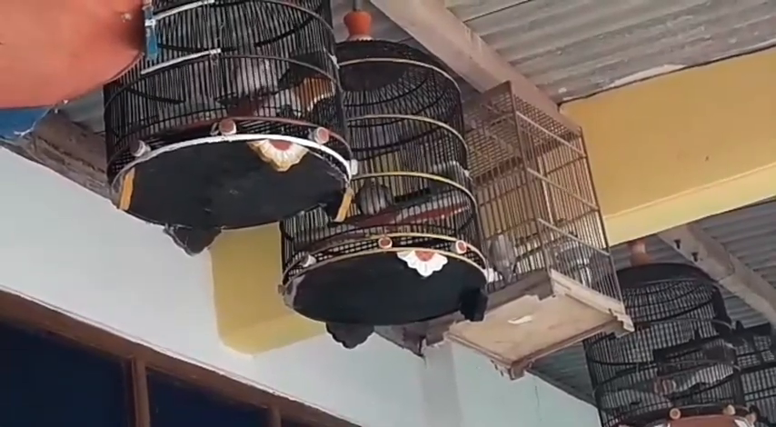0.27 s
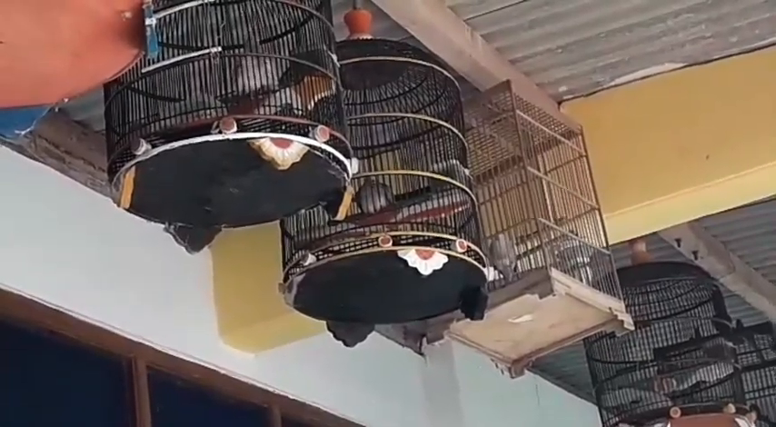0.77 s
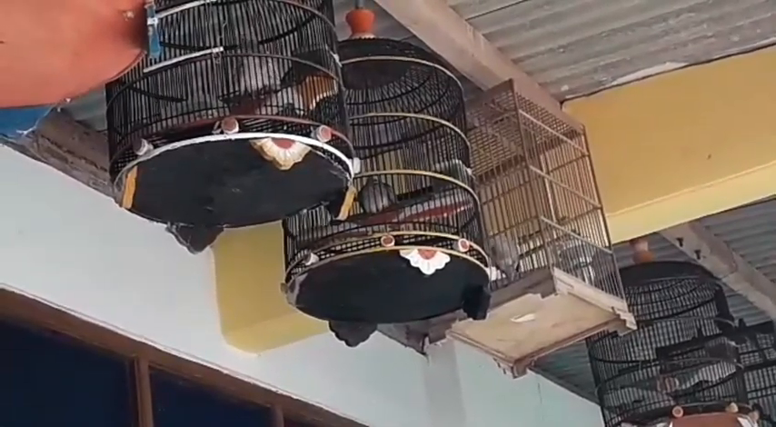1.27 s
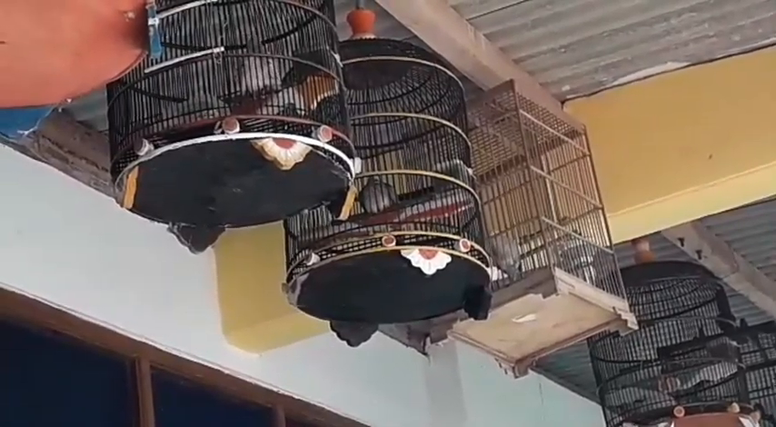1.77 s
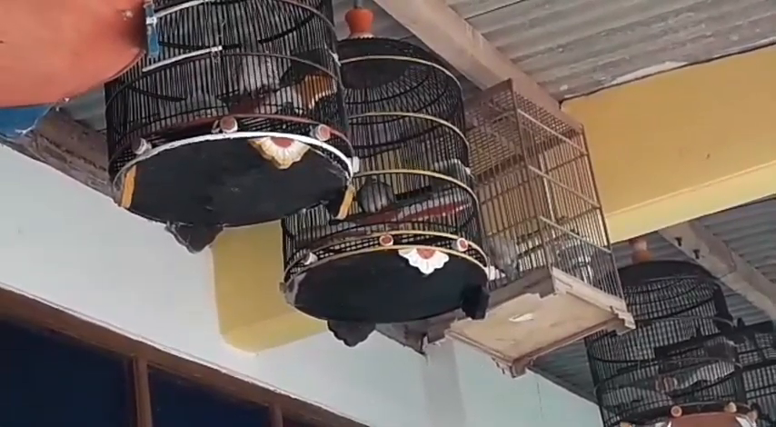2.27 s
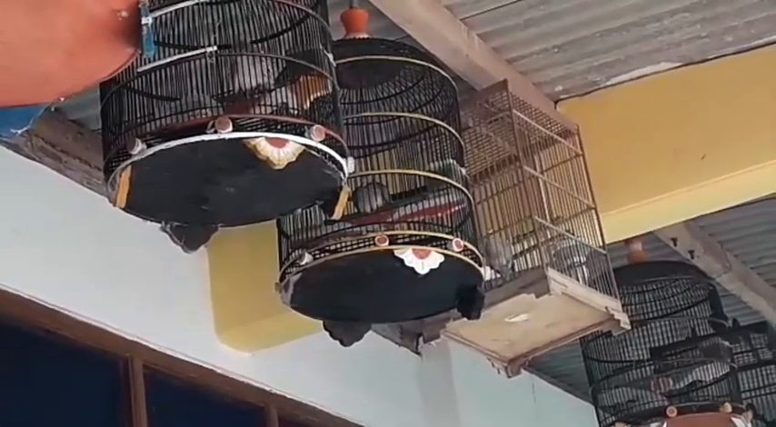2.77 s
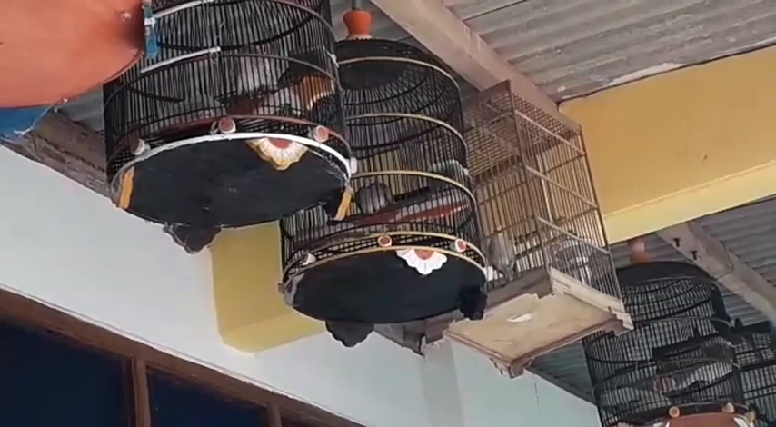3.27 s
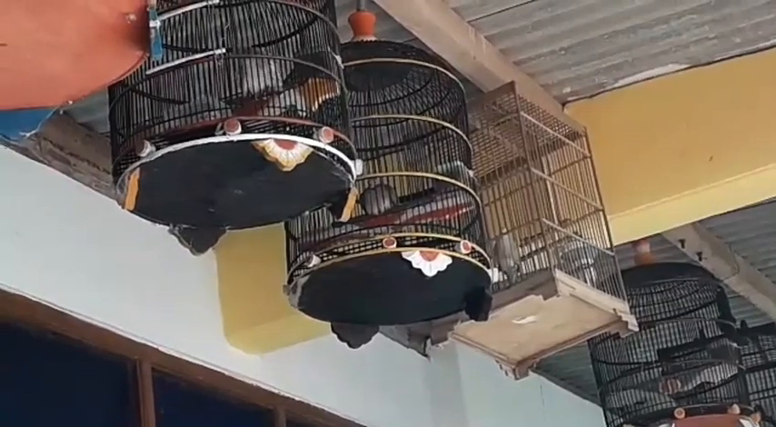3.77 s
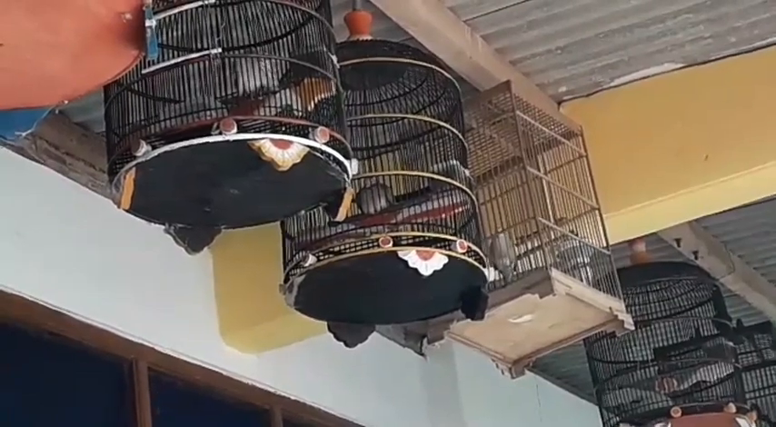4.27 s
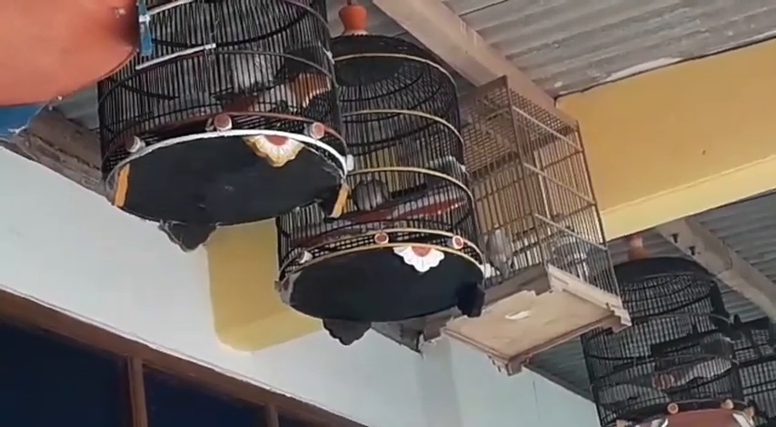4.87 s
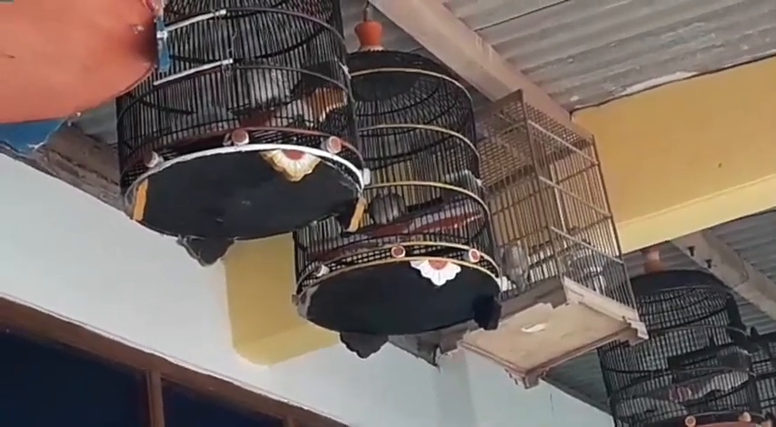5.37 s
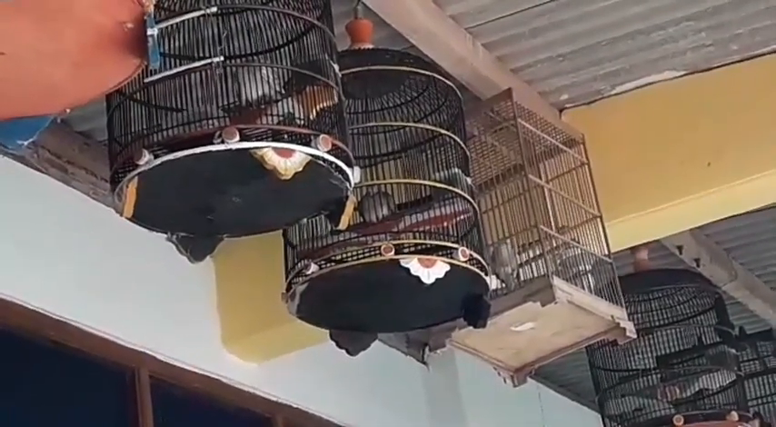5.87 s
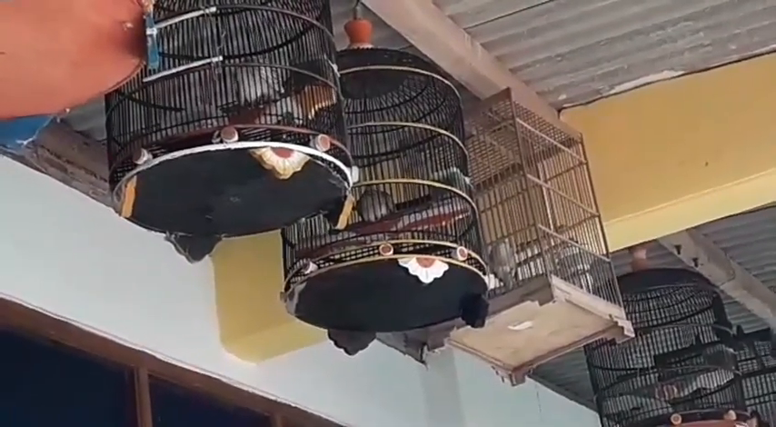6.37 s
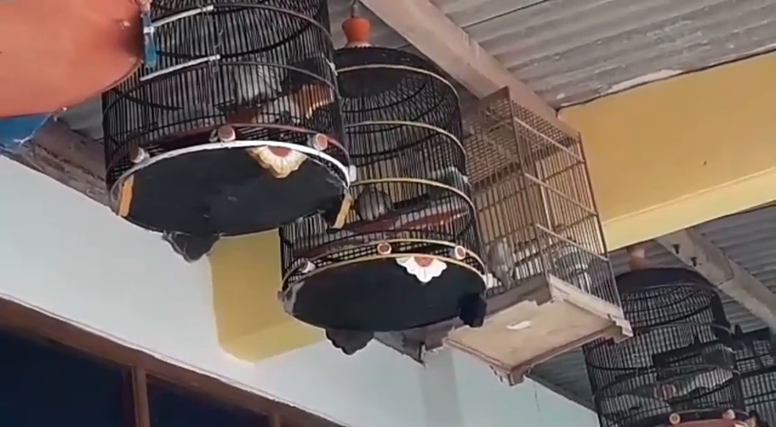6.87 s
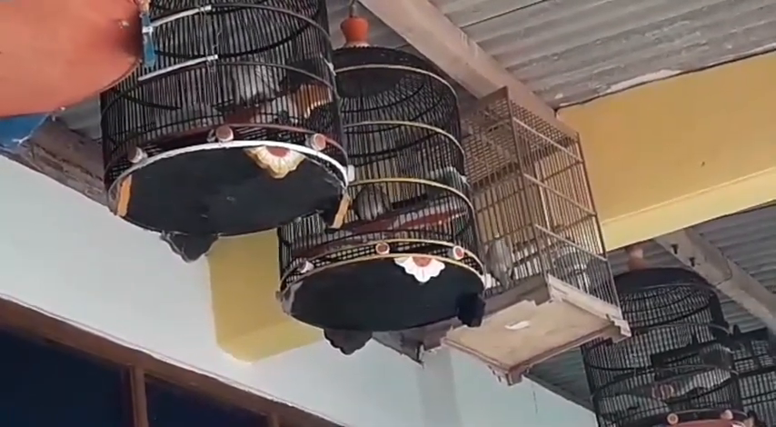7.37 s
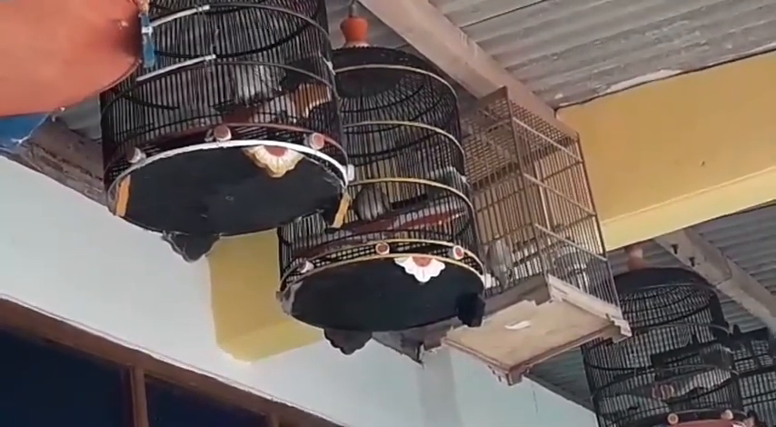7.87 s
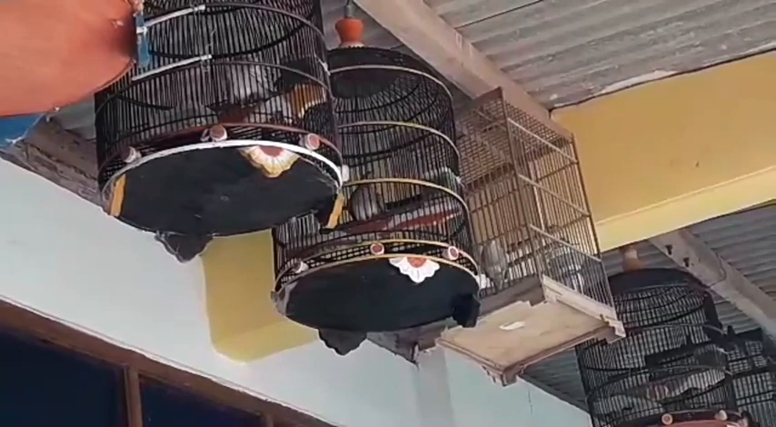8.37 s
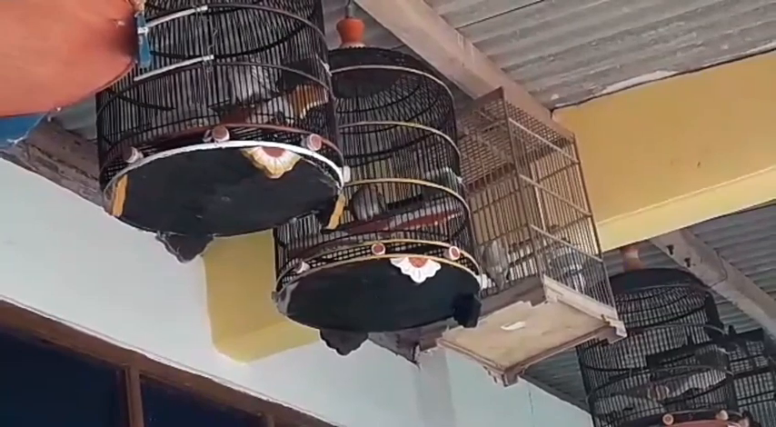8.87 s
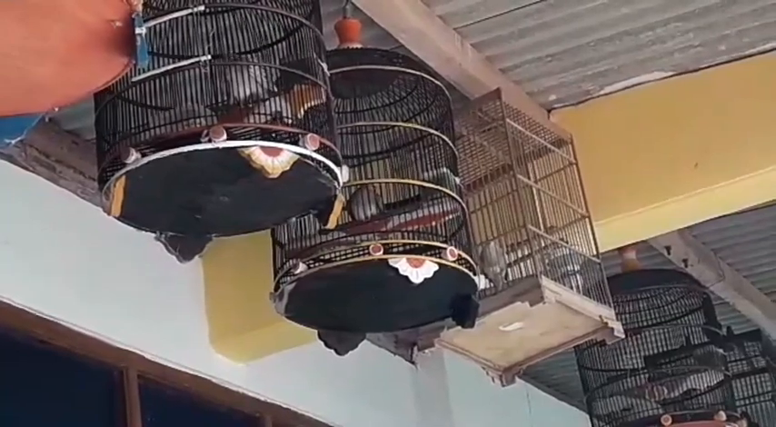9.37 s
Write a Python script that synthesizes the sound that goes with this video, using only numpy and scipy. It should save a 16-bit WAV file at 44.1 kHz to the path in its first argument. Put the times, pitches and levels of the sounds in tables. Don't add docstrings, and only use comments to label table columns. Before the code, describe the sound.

Outdoor porch, handheld phone below hanging cages. Distant doves hoot softly first, then a near dove gives a rapid rolling phrase ending in a longer sagging coo. A neighbour replies with five spaced coos, softening each time, before the near dove sings again and others follow. Bristles scrape the floor with sharper strokes later, cages tick lightly, thin bird whistles and engine throbs stay behind.

```python
import sys
import numpy as np
from scipy import signal
from scipy.io import wavfile
from scipy.ndimage import uniform_filter1d

SR = 44100
rng = np.random.default_rng(int(sys.argv[2]) if len(sys.argv) > 2 else 0)


def volts_from_db(level):
    exponent = np.asarray(level, float) / 20
    return 10 ** exponent


def waveform_to_disk(signal):
    frames = np.transpose(np.atleast_2d(signal))
    scaled = np.clip(frames, -1, 1) * 32767
    samples = np.round(scaled).astype(np.int16)
    wavfile.write(sys.argv[1], SR, samples)


N = 424683

# (time [s], stretch of the durations [ratio], lead-in [s])
OPENS = [
    (3.583, 1.015, .034),
    (7.693, .985, .026),
]


def band(x, lo_hz, hi_hz):
    y = signal.sosfilt(signal.butter(2, [lo_hz, hi_hz], "bandpass", fs=SR, output="sos"), x)
    return y / np.std(y)


def add(out, start_s, x):
    i = int(start_s * SR)
    a, b = max(i, 0), min(i + len(x), N)
    out[a:b] += x[a - i:b - i]


def rise(t, width_s):
    return .5 + .5 * np.tanh(t / width_s)


def resonance(x, centre_hz, width_hz):
    return signal.lfilter(*signal.iirpeak(centre_hz, centre_hz / width_hz, fs=SR), x)


def room(x, t60_s, wet_db, gap_s, boom_hz, boom_width):
    t = np.arange(SR) / SR
    tail = rng.standard_normal(SR) * volts_from_db(-60 * t / t60_s) * rise(t - gap_s, .004)
    tail = resonance(tail / np.linalg.norm(tail), boom_hz, boom_width)
    return x + volts_from_db(wet_db) * signal.fftconvolve(x, tail)[:N]


def glides(rows, settle):
    out = np.zeros(N)
    for s, length, from_hz, to_hz, db in rows:
        along = np.arange(int(length * SR)) / (length * SR)
        hz = to_hz + (from_hz - to_hz) * np.exp(-along / settle)
        tone = np.sin(2 * np.pi * np.cumsum(hz) / SR)
        add(out, s, np.sqrt(2) * volts_from_db(db) * np.sin(np.pi * along) ** .5 * tone)
    return out


def yard():
    # (frequency [Hz], density [dB per Hz])
    spectrum = [(15, -41), (25, -5), (91, 11), (307, 0), (555, -27.5), (789, 8), (1150, -21), (1390, -8),
                (1970, -11.5), (2510, -6.5), (3120, -13), (3980, 5.5), (6120, -17), (8460, 1), (15700, -76)]
    # (time [s], level [dB])
    traffic = [(0.0, -61.5), (0.21, -65.5), (1.21, -66), (1.5, -69), (2.63, -65.5), (2.9, -67.5),
               (4.56, -65), (5.34, -60.5), (6.36, -65.5), (7.11, -62.5), (7.38, -63.5), (9.63, -62)]
    hz, db = np.transpose(spectrum)
    out, hold = 0, SR // 9
    swell_db = 1.1 * (np.interp(np.arange(N) / SR, *np.transpose(traffic)) + 65)
    for f in 28 * 2 ** np.arange(0, 9.2, 1 / 3):
        flicker = np.repeat(rng.standard_normal(N // hold + 1), hold)[:N]
        flicker = uniform_filter1d(flicker, hold)
        level_db = np.interp(np.log(f), np.log(hz), db) + 10 * np.log10(f)
        level_db = level_db + 3.6 * flicker + swell_db * (f < 450)
        out = out + volts_from_db(level_db) * band(rng.standard_normal(N), f / 1.12, f * 1.12)
    return volts_from_db(-60) * out / np.std(out)


def engine_throbs():
    # (time [s], duration [s], start frequency [Hz], end frequency [Hz], level [dB])
    pulses = [(.05, 0.05, 127, 129, -61), (.5, 0.19, 314, 331, -68), (.9, 0.028, 286, 280, -51),
              (.89, 0.028, 710, 603, -55.5), (.9, 0.021, 473, 450, -54.5), (2.05, 0.16, 116, 109, -61.5),
              (3.45, 0.12, 124.5, 137, -61.5), (5.25, 0.1, 131.4, 154, -61.5), (5.7, 0.08, 102, 112, -57),
              (6.62, 0.098, 127, 122, -54), (6.93, 0.029, 136, 142, -59.5), (7.12, 0.22, 90, 81, -58)]
    return room(glides(pulses, settle=0.58), t60_s=0.47, wet_db=6.0, gap_s=0.0064, boom_hz=200, boom_width=200)


def songbirds():
    # (time after its start [s], duration [s], start frequency [Hz], end frequency [Hz], level [dB])
    phrase = [
        (.015, 0.044, 2360, 2540, 5.5),
        (.025, 0.066, 2560, 2770, -0.5),
        (.138, 0.054, 3400, 2800, 0),
        (.135, 0.018, 3800, 3100, -3.5),
        (.262, 0.021, 3180, 3150, -3.5),
        (.2, 0.077, 3100, 2590, -3),
        (0.25, 0.08, 3000, 2600, -0.5),
    ]
    # (time [s], level [dB])
    sung = [
        (-.02, -54),
        (2.802, -56),
        (6.199, -52),
    ]
    # (time [s], duration [s], start frequency
    # [Hz], end frequency [Hz], level [dB])
    chirps = [(.51, .08, 1700, 1500, -59), (.43, .07, 1930, 1990, -73), (.57, 0.033, 2260, 2170, -66),
              (.6, 0.1, 1830, 1900, -66.5), (.74, .06, 3380, 3330, -71), (.93, .06, 3250, 3270, -68.5),
              (1.16, 0.047, 3620, 3540, -62.5), (1.52, 0.028, 3550, 3580, -69),
              (7.7, .06, 3430, 3400, -63.5), (8.3, .12, 3280, 3230, -65), (4.73, 0.044, 3400, 3500, -67),
              (6.46, .015, 3200, 3150, -57), (0.796, 0.052, 2060, 2040, -63),
              (1.406, 0.042, 3720, 3620, -64), (1.441, 0.036, 3510, 3440, -62),
              (1.694, 0.038, 3650, 3460, -61.5), (1.97, 0.051, 3450, 3360, -63),
              (2.063, 0.037, 3260, 3490, -61.5), (2.24, 0.049, 3510, 3430, -64.5),
              (3.342, 0.094, 2040, 2090, -65), (5.697, .015, 4050, 4100, -55),
              (5.71, .025, 4100, 3400, -57), (5.765, .03, 3050, 2800, -59), (8.0, 0.064, 3400, 3560, -61),
              (8.07, 0.066, 3520, 3480, -64.5), (6.19, 0.0216, 3200, 3580, -57.5),
              (6.253, 0.029, 3730, 3930, -68), (3.555, 0.043, 6100, 5930, -61),
              (3.593, .18, 5660, 5450, -70), (3.601, 0.14, 2280, 2240, -64.5),
              (7.762, 0.083, 2290, 2173, -63), (3.796, 0.058, 5330, 5420, -66),
              (5.604, 0.012, 3470, 3450, -59), (7.812, 0.075, 3340, 3194, -62)]
    rows = []
    for start_s, start_db in sung:
        rows += [(start_s + s, length, a, b, start_db + db) for s, length, a, b, db in phrase]
    warble = band(rng.standard_normal(N), 30, 200)
    song = volts_from_db(4.9 * warble) * glides(rows, settle=0.1375)
    song += volts_from_db(4.5 * warble) * glides(chirps, settle=.5)
    return room(song, t60_s=0.35, wet_db=-2.5, gap_s=0.016, boom_hz=2700, boom_width=5600)


def sweeping():
    # (time [s], level [dB])
    steady = [(0, -64), (.4, -64.5), (1.4, -64), (2.4, -65.5), (3.2, -60), (3.6, -58), (4.4, -59.5),
              (5.2, -58), (5.7, -55.5), (6.6, -56), (7.4, -56.5), (7.8, -54), (9.63, -54)]
    # (time [s], level [dB], body level [dB], top level [dB])
    strokes = [(0, -63, -60, -72), (0.101, -54, -52, -61.5), (0.631, -54.5, -55.5, -75),
               (.97, -59.5, -54.5, -68.5), (1.139, -54, -57.5, -81), (2.26, -63, -66.5, -75),
               (2.592, -53.5, -58.5, -78), (3.059, -54, -81, -76), (3.44, -55, -80, -64),
               (3.6, -65.5, -57.5, -63.5), (7.02, -56, -58, -55.5), (4.2, -65, -61.5, -69.5),
               (4.57, -53.5, -59.5, -81), (4.97, -54.5, -56.5, -77), (5.28, -64, -89, -65),
               (5.42, -61, -83, -72), (5.84, -50.5, -55, -67.5), (5.95, -52.5, -68, -72),
               (6.91, -53, -58.5, -61.5), (7.15, -57.5, -55.5, -60), (7.581, -51, -71, -67),
               (8.159, -56, -55.5, -70), (8.8, -69, -65, -65), (9.53, -55.5, -63.5, -73)]
    body_db, top_db, top_slope = -8.5, -10, 1.1
    steady_grit_db, stroke_grit_db = -7.5, -3.5
    attack_s, release_s = 0.028, 0.11
    db = np.interp(np.arange(N) / SR, *np.transpose(steady))
    near_db = db + 58
    steady_db = [db, db + body_db, db + top_db + (top_slope - 1) * near_db, db + steady_grit_db]
    power = volts_from_db(np.array(steady_db)) ** 2
    after = np.arange(-SR // 5, SR) / SR
    shape = np.exp(np.minimum(2 * after / attack_s, -2 * after / release_s))
    for s, *dbs in strokes:
        for layer, stroke_db in zip(power, dbs + [dbs[0] + stroke_grit_db]):
            add(layer, s + after[0], volts_from_db(stroke_db) ** 2 * shape)
    return np.sqrt(power)


def rustle():
    level, body, top, grit = sweeping()
    scratch = rng.standard_normal((4, N)) * volts_from_db(1.4 * np.minimum(rng.exponential(size=N), 7))
    out = level * band(band(scratch[0], 1900, 11530), 2200, 9900)
    out += grit * band(scratch[1], 1200, 3200)
    out += body * band(scratch[2], 155, 1125)
    return out + top * band(scratch[3], 11500, 20000)


def scrapes():
    # (time [s], peak level [dB], decay time t60 [s])
    touches = [(0.0897, -45.5, 0.32), (0.9494, -59, 0.28), (1.1194, -53, 0.22), (2.5694, -58, 0.23),
               (4.1894, -32, 0.25), (4.5594, -52, 0.23), (5.2729, -33, 0.19), (5.8334, -22, 0.25),
               (6.8992, -31, 0.26), (7.568, -24, 0.068), (8.1494, -31.5, 0.27), (9.509, -29.5, 0.25)]
    out, t = np.zeros(N), np.arange(SR // 4) / SR
    hiss = band(rng.standard_normal(N), 1500, 14000)
    for s, db, t60_s in touches:
        add(out, s, volts_from_db(db - 20.0 - 60 * t / t60_s) * rise(t - .002, .001))
    return out * hiss


def taps():
    # (time [s], centre frequency [Hz], level [dB], decay time t60 [s])
    impacts = [
        (4.2, 4900, -57, .14),
        (5.275, 8200, -58, .1),
        (8.15, 2100, -57, .05),
        (8.15, 4400, -56, .06),
        (4.95, 8000, -61, .12),
        (7.575, 2300, -59, .08),
        (.025, 380, -60, .4),
        (.63, 250, -62, .15),
        (.92, 240, -60, .15),
        (.26, 8800, -60, .05),
    ]
    out, t = np.zeros(N), np.arange(SR // 3) / SR
    for s, hz, db, t60_s in impacts:
        noise = band(rng.standard_normal(len(t)), hz / 1.12, hz * 1.12)
        add(out, s, volts_from_db(db - 60 * t / t60_s) * rise(t - .004, .002) * noise)
    return out


def dove(notes, lead_db, grow_db_s, break_s, scoop_hz, snap_db, snap_s, swell_db, arch_db, hook_hz, flutter_db):
    # (multiple of the fundamental [ratio], level [dB])
    overtones = [(2, -44.5), (3, -50.5), (5, -45.5)]
    out = np.zeros(N)
    flutter = band(rng.standard_normal(N), 12, 70)
    for s, lead, length, top_hz, end_hz, db in notes:
        t = np.arange(-int(lead * SR) - 600, int(length * SR) + 600) / SR
        along = np.clip(t / length, 0, 1)
        closing = np.exp(np.minimum(t - length, .006) / .012)
        hz = top_hz + (end_hz - top_hz) * along ** 1.7 - hook_hz * closing ** 2
        body = volts_from_db(swell_db * closing * (top_hz - end_hz) / 55)
        body *= volts_from_db(arch_db * (np.sin(np.pi * along ** 1.5) - 1))
        if lead > .014:
            low_hz = 925 + 105 * np.minimum(t, 0) / lead
            hz = low_hz + (hz - low_hz) * rise(t - snap_s, snap_s)
            burst = volts_from_db(snap_db + .18 * (top_hz - 1085)) * np.exp(-((t - .0022) / .0035) ** 2)
            lead_in = volts_from_db(lead_db + grow_db_s * np.minimum(t + .01, 0))
            lead_in *= rise(t + lead - .004, .004) * rise(-t - break_s, .003)
            shape = body * rise(t, .0025) + burst + lead_in
        else:
            hz -= scoop_hz * rise(.008 - t, .008)
            shape = body * rise(t - .006, .005)
        phase = 2 * np.pi * np.cumsum(hz) / SR
        tone = np.sin(phase) + sum(volts_from_db(h_db) * np.sin(k * phase) for k, h_db in overtones)
        add(out, s + t[0], np.sqrt(2) * volts_from_db(db) * shape * rise(length - t, 0.0068) * tone)
    return out * volts_from_db(flutter_db * flutter)


def hoots(rows, creep_hz):
    return [(s, 0, length, hz, hz + creep_hz, db) for s, length, hz, db in rows]


def coos(rows, lead_s):
    return [(s, lead_s, *rest) for s, *rest in rows]


def distant_doves():
    # (time [s], duration [s], frequency [Hz], level [dB])
    hoarse = [(2.78, 0.036, 1050, -48.5), (2.86, 0.095, 1010, -54.5), (2.8, 0.27, 895, -62),
              (3.03, 0.047, 1015, -52), (3.165, 0.04, 1012, -50.5), (3.28, 0.045, 925, -54.5),
              (4.56, 0.59, 805, -75.5), (4.95, 0.27, 785, -75.5), (4.5, 0.21, 1460, -75),
              (4.85, 0.28, 1422, -80.5), (5.5, 0.046, 1065, -64.5), (5.53, 0.073, 1250, -56.5),
              (5.62, 0.098, 1185, -58), (5.95, 0.055, 1220, -57), (6.15, 0.1, 1252, -60.5)]
    song = dove(hoots(hoarse, -10), lead_db=0, grow_db_s=0, break_s=0, scoop_hz=40, snap_db=0, snap_s=.01,
                swell_db=0, arch_db=3, hook_hz=0, flutter_db=7)
    return room(song, t60_s=.45, wet_db=4, gap_s=.008, boom_hz=1050, boom_width=900)


def far_doves():
    # (time [s], duration [s], frequency [Hz], level [dB])
    low = [(.665, 0.065, 896, -50), (.82, 0.017, 878, -36.5), (1.05, 0.049, 823, -48.5),
           (1.895, 0.06, 853, -44), (1.955, 0.024, 910, -40.5), (2.175, 0.051, 850, -42.5),
           (2.245, 0.048, 888.5, -40), (2.335, 0.022, 890, -71), (2.465, 0.047, 845, -46.5),
           (2.6, 0.11, 869.4, -46), (2.745, 0.023, 861, -44.5), (3.05, 0.12, 850.4, -42.5),
           (3.24, 0.016, 833, -47.5), (3.495, 0.094, 834, -42.5), (6.45, 0.029, 918, -36.5)]
    # (time [s], duration [s], top frequency [Hz], end frequency [Hz], level [dB])
    leaps = [
        (.44, 0.062, 966, 1060, -42.5),
        (.555, 0.058, 994, 943, -46.5),
        (1.028, 0.057, 1125, 1010, -43),
        (1.186, 0.066, 999, 988, -41.5),
        (1.412, 0.0566, 1037, 1018, -42.5),
        (1.655, 0.077, 1073, 1081, -43),
    ]
    high = [(.478, 0.04, 1185, 1156, -40.5), (.58, 0.041, 1154, 1023, -43), (.775, 0.082, 973, 1074, -40.5),
            (.868, 0.0095, 1041, 1042, -26.5), (.915, 0.014, 1000, 930, -52),
            (1.725, 0.027, 1067, 970, -35.5), (2., 0.013, 972, 1148, -36), (3.345, 0.047, 1033, 1050, -44),
            (3.4, 0.075, 1037, 1000, -44), (5.79, 0.17, 1100, 1056, -62), (8.69, 0.12, 948, 1008, -56),
            (9.06, 0.033, 1090, 1032, -39.5), (9.43, 0.047, 916, 1020, -44), (7.58, 0.015, 950, 960, -56),
            (7.61, .02, 990, 1000, -58), (.66, 0.063, 1120, 1100, -53), (.93, 0.029, 990, 937, -48),
            (8.615, 0.041, 950, 996, -51)]
    song = dove(hoots(low, 22) + coos(leaps, .038) + coos(high, 0),
                lead_db=-0.5, grow_db_s=57, break_s=0.0015, scoop_hz=49.7, snap_db=-6.0, snap_s=0.0091,
                swell_db=-1.5, arch_db=2.5, hook_hz=29.8, flutter_db=2.0)
    return room(song, t60_s=0.37, wet_db=2.0, gap_s=0.01, boom_hz=930, boom_width=340)


def middle_doves():
    # (time [s], duration [s], frequency [Hz], level [dB])
    low = [(5.575, 0.086, 913, -38), (5.665, 0.01, 963, -40), (5.72, 0.026, 950, -28.5),
           (5.765, 0.017, 928, -33.5), (5.83, 0.044, 907.5, -33), (5.892, 0.034, 902, -39),
           (5.978, 0.03, 895, -35.5), (8.825, 0.023, 911, -40), (8.927, 0.019, 942, -28.5),
           (8.965, 0.027, 914, -49), (9.04, 0.023, 930, -30), (9.352, 0.014, 862, -31),
           (9.485, 0.017, 887, -31.5)]
    # (time [s], duration [s], top frequency [Hz], end frequency [Hz], level [dB])
    leaps = [
        (5.698, 0.0527, 1145, 1055, -37),
        (8.678, .098, 1169, 1120, -41),
        (9.595, 0.015, 1030, 1050, -34),
    ]
    high = [
        (8.8, 0.0511, 1106, 1007, -34),
        (9.305, 0.0394, 1050, 1030, -38.5),
        (9.372, .03, 1050, 1030, -32.5),
        (5.72, 0.0484, 1075, 1050, -36),
        (8.965, 0.032, 1000, 1200, -43),
    ]
    # (time [s], lead-in [s], duration [s], top frequency [Hz], end frequency [Hz], level [dB])
    slow = [
        (9.198, 0.06, .115, 1105, 1019, -34.5),
    ]
    song = dove(hoots(low, 31.7) + coos(leaps, .026) + coos(high, 0) + slow,
                lead_db=-2.0, grow_db_s=150, break_s=.003, scoop_hz=54.4, snap_db=-5.0, snap_s=0.0051,
                swell_db=2.5, arch_db=0.5, hook_hz=42.7, flutter_db=2.0)
    return room(song, t60_s=0.58, wet_db=1.0, gap_s=0.006, boom_hz=980, boom_width=330)


def second_dove():
    # (time [s], duration [s], level [dB])
    repeats = [
        (6.104, 0.076, -23.5),
        (6.339, 0.088, -24.5),
        (6.611, 0.11, -25.5),
        (6.891, 0.12, -27),
        (7.169, 0.12, -28),
    ]
    notes = [(s, .033, length, 1084, 1037, db) for s, length, db in repeats]
    song = dove(notes, lead_db=-9, grow_db_s=352, break_s=0.0017, scoop_hz=0, snap_db=-33, snap_s=0.0045,
                swell_db=8.0, arch_db=8.0, hook_hz=42.2, flutter_db=0.37)
    return room(song, t60_s=0.31, wet_db=2.0, gap_s=0.015, boom_hz=910, boom_width=120)


def clicks():
    # (time [s], level [dB])
    puffs = [
        (.1, -44),
        (2.735, -51),
        (3.455, -53),
        (3.539, -35),
        (4.0, -44),
        (4.125, -44),
        (6.07, -47),
        (7.14, -52),
        (7.642, -37),
        (8.268, -44.5),
    ]
    out, t = np.zeros(N), np.arange(SR // 10) / SR
    for s, db in puffs:
        add(out, s, volts_from_db(db) * rise(t - .006, 0.0022) * np.exp(-t / 0.06))
    return out * band(band(band(rng.standard_normal(N), 700, 1300), 700, 1350), 680, 1400)


def throbbing():
    # (time after the phrase starts [s], level [dB])
    throb = [
        (0.127, -6),
        (.145, -2.5),
        (.165, -1.5),
        (0.182, 4),
        (.192, -5.5),
        (.201, 4),
        (.209, -6),
        (.216, -3),
        (.226, -7),
    ]
    t, (s, db) = np.arange(N) / SR, np.transpose(throb)
    gain_db = sum(np.interp(t, start_s + k * s, db, left=0, right=0) for start_s, k, lead in OPENS)
    return volts_from_db(uniform_filter1d(gain_db, size=180))


def near_song():
    # (time after its start [s], duration [s], top [Hz], end [Hz], level [dB])
    opening = [
        (0, 0.089, 1120, 1129, -27.5),
        (0.093, 0.026, 1122, 1108, -32.5),
        (0.126, .093, 1096, 1027, -22),
    ]
    # (time [s], duration [s], frequency [Hz], level [dB])
    low = [
        (3.806, .018, 896, -31),
        (3.828, 0.018, 917, -18),
        (3.852, 0.031, 910, -33),
        (3.905, 0.037, 912, -25.5),
        (7.928, 0.025, 875, -32.5),
        (7.953, 0.027, 912, -24),
    ]
    # (time [s], duration [s], level [dB])
    stutters = [
        (-.004, .03, -23.5),
        (4.027, .022, -21.5),
        (8.056, .014, -20),
        (8.163, .027, -23),
    ]
    closes = [
        .1315,
        4.151,
        8.3,
    ]
    lead_s = .028
    notes = []
    for start_s, k, lead in OPENS:
        notes += [(start_s + k * s, lead * (s == 0), k * length, *rest) for s, length, *rest in opening]
    notes += hoots(low, -9.5)
    notes += [(s, lead_s, length, 1084, 1052, db) for s, length, db in stutters]
    return notes + [(s, lead_s, .158, 1082.8, 1034, -24.5) for s in closes]


def near_dove():
    song = throbbing() * dove(near_song(), lead_db=-3, grow_db_s=260, break_s=.005, scoop_hz=8, snap_db=4.5,
                              snap_s=.006, swell_db=6.5, arch_db=0, hook_hz=12, flutter_db=.4)
    add(song, .033, volts_from_db(-16) * song)
    return room(song + clicks(), t60_s=0.3, wet_db=-7.5, gap_s=0.01, boom_hz=900, boom_width=300)


def scene():
    hiss = yard() + rustle()
    hiss = hiss - .45 * resonance(hiss, 1850, 700)
    doves = distant_doves() + far_doves() + middle_doves() + second_dove() + near_dove()
    return (hiss + engine_throbs() + songbirds() + scrapes() + taps() + doves)[None]


def low_pass(x):
    return signal.sosfilt(signal.butter(12, 15880, fs=SR, output="sos"), x)


def record(dry):
    cut = signal.sosfilt(signal.ellip(8, .2, 70, 15800, fs=SR, output="sos"), dry)
    return low_pass(cut)


dry = scene()
out = record(dry)
waveform_to_disk(out)
```